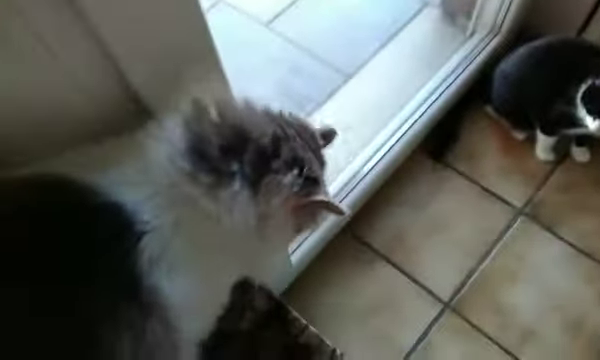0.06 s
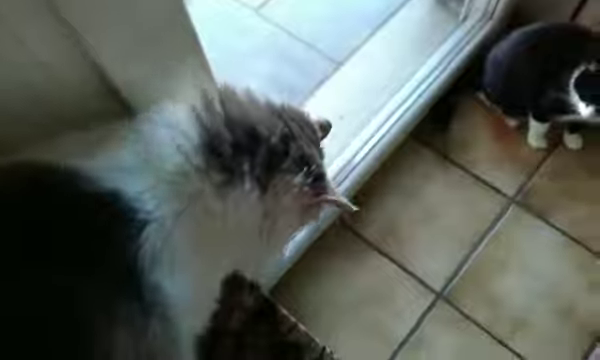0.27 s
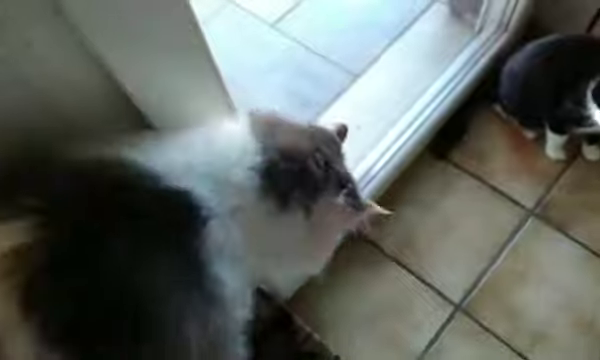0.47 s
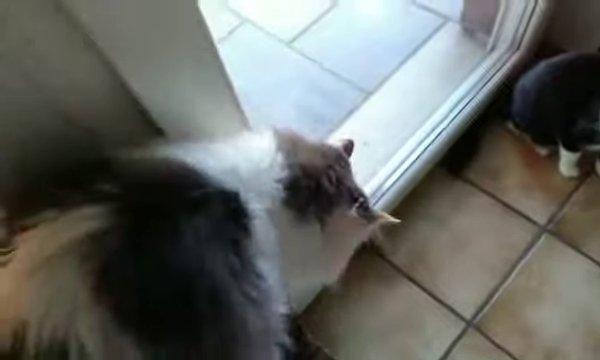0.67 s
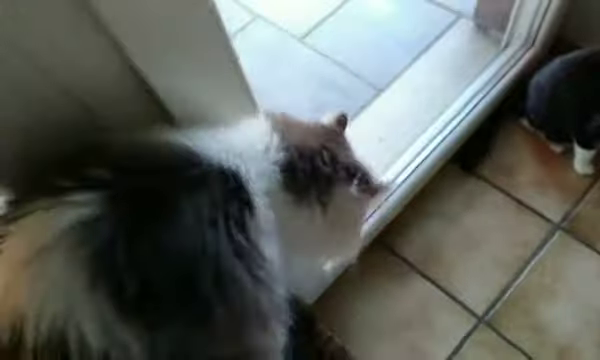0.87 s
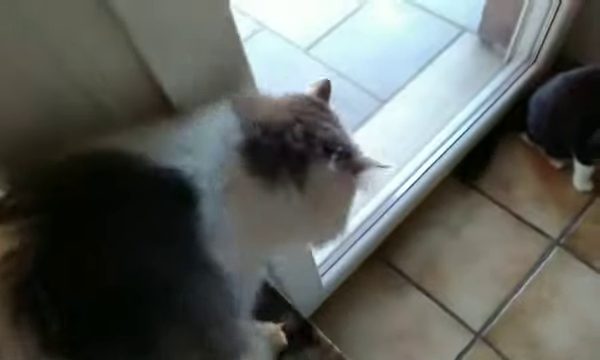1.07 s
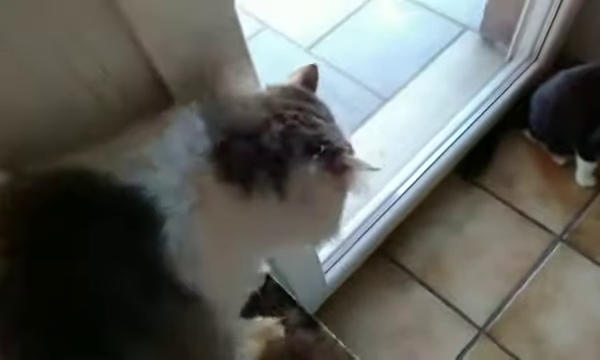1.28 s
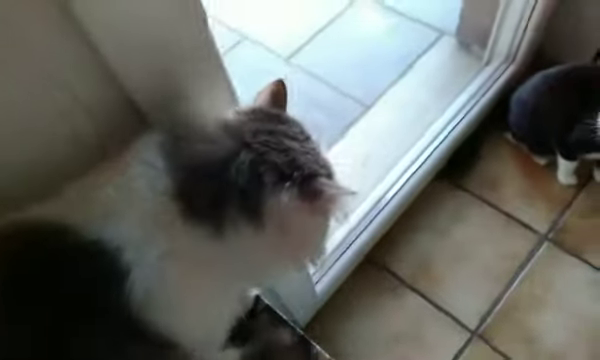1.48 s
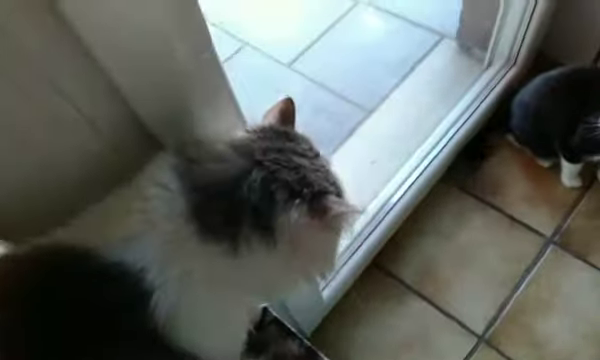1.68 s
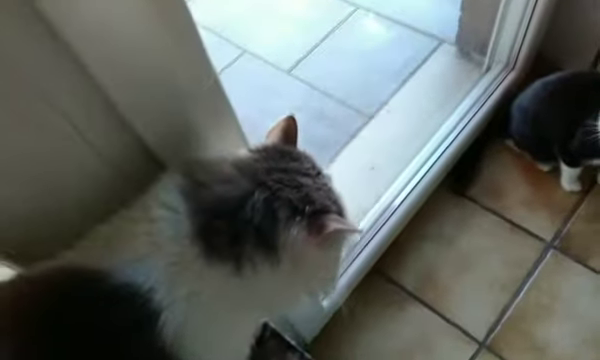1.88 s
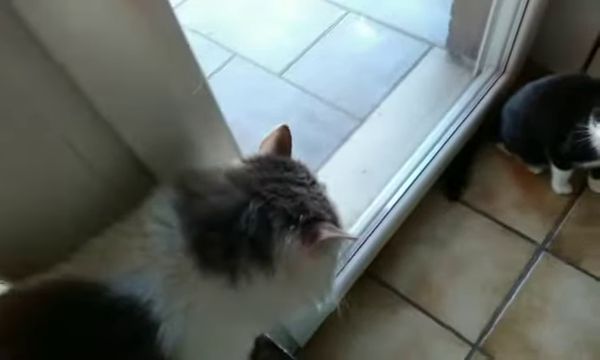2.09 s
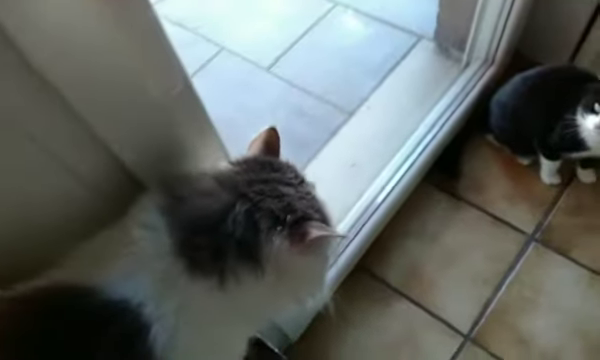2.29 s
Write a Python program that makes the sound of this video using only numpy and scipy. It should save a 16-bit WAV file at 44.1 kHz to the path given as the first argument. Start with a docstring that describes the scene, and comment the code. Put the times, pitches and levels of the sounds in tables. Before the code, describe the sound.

A cat growls, rises into a raspy, hissing yowl, then sinks back to a growl.

```python
"""A cat warns another in one long call, beside an open door in a quiet tiled room.
Its vocal folds buzz and flutter behind a closed mouth, making a growl. The mouth opens and the
pitch climbs into a yowl, with rasping breath, a hiss through bared teeth and a hoarse crack.
Then the mouth closes and the growl sinks and fades. Two faint taps sound near the end.
Tiles and door add a short echo, and a low rumble lies under it all."""
import sys
import numpy as np
from scipy import signal
from scipy.fft import rfft, irfft
from scipy.io import wavfile

SR = 44100
rng = np.random.default_rng(int(sys.argv[2]) if len(sys.argv) > 2 else 0)


def file_out(sig):
    """Save sig as 16-bit WAV at sys.argv[1]."""
    # one column per channel
    cols = np.atleast_2d(sig).T
    # limit, then scale
    lim = np.clip(cols, -1, 1)
    pcm = np.round(lim * 32767).astype(np.int16)
    wavfile.write(sys.argv[1], SR, pcm)


N = 108045
TIME = np.arange(N) / SR
OVERTONE_JITTER, OVERTONE_SHIMMER = .008, .22   # random wobble in timing [cycles] and in strength

# The tune of the call: (time [s], pitch [Hz])
CALL_PITCH = [(.14, 168.7), (.24, 191.8), (.29, 235.7), (.33, 319.8), (.38, 339.6), (.44, 342.6),
              (.55, 362.5), (.65, 378.1), (.79, 380.4), (.83, 412.3), (.92, 450.7), (.945, 479.2),
              (.99, 485.7), (1.07, 418.4), (1.15, 300.4), (1.26, 296.8), (1.34, 256.2), (1.6, 243.2),
              (1.67, 212.7), (1.9, 200.1), (2.14, 172.8), (2.21, 160.3), (2.3, 118.8)]
# The fast trembling of the voice: (time [s], depth [0-1], rate [Hz])
VOICE_FLUTTER = [(.2, .7, 60), (.33, .58, 62), (.42, .12, 64), (.9, .17, 64), (1.1, .17, 66),
                 (1.2, .55, 66), (1.35, .27, 66), (1.58, .32, 67), (1.7, .58, 64), (2.15, .72, 56)]


def from_db(db):
    """Turn decibels into a number to multiply by."""
    return 10 ** (np.asarray(db) / 20)


def unit_power(x):
    """Scale a signal to an average power of one."""
    return x / np.sqrt(np.mean(x ** 2) + 1e-20)


def in_time(rows):
    """Join a table's points with straight lines: one curve for each column after the time."""
    times, *columns = np.transpose(rows)
    return [np.interp(TIME, times, column) for column in columns]


def gain_at(colour, hz):
    """Read a table of frequencies and levels as a gain at the given frequencies."""
    points_hz, db = np.transpose(colour)
    return from_db(np.interp(np.log(hz + 1e-9), np.log(points_hz), db))


def shaped(x, colour):
    """Make each frequency louder or softer, as the table says."""
    return irfft(rfft(x) * gain_at(colour, np.fft.rfftfreq(N, 1 / SR)), N)


def noise(colour):
    """Noise with the given balance of low and high frequencies."""
    return unit_power(shaped(rng.standard_normal(N), colour))


def drift(rate_hz):
    """A smooth random wobble, mostly slower than the given rate."""
    hz = np.fft.rfftfreq(N, 1 / SR)
    return unit_power(irfft(rfft(rng.standard_normal(N)) / (1 + (hz / rate_hz) ** 4), N))


def narrow_noise(hz, width_hz):
    """Noise gathered around one frequency, which may move."""
    angle = 2 * np.pi * np.cumsum(hz * np.ones(N)) / SR
    return drift(width_hz) * np.cos(angle) + drift(width_hz) * np.sin(angle)


def swell(start_s, end_s, rise_s, fall_s):
    """Fade in, hold and fade out."""
    return np.clip((TIME - start_s) / rise_s, 0, 1) * np.clip((end_s - TIME) / fall_s, 0, 1)


def background():
    """The quiet room's steady low rumble."""
    # Tone of the rumble: (frequency [Hz], level [dB])
    colour = [(25, -13), (38, -6), (52, 6), (70, -3.5), (105, 5), (180, -9.5), (380, -9), (600, -27.5),
              (1000, -40.5), (2500, -42.5), (12000, -41.5), (13500, -48.5)]
    return from_db(-64.5) * noise(colour)


def vocal_folds():
    """The folds swing and flutter unevenly, which bends the pitch and chops the overtones into bursts."""
    hz, = in_time(CALL_PITCH)
    depth, rate = in_time(VOICE_FLUTTER)
    uneven = .28   # how much noise mixes into the flutter
    beat = 2 * np.pi * np.cumsum(rate * (1 + .24 * depth * drift(35.6))) / SR
    flutter = depth * (np.cos(beat) + uneven * narrow_noise(rate * 1.1, 37))
    bend = .22 * depth * (np.cos(beat - .8) + uneven * narrow_noise(rate, 40))
    waver = (.006 + .02 * depth) * drift(35.3)
    phase = 2 * np.pi * np.cumsum(hz * (1 + bend + waver)) / SR
    # Nearly half a beat late: the overtones burst out as the lowest tone ebbs.
    late_flutter = depth * (np.cos(beat - 2.66) + uneven * narrow_noise(rate, 55))
    bursts = (1 + np.tanh(late_flutter)) / np.sqrt(1 + depth / 2)
    return phase, flutter, bursts


def lowest_tone(phase, flutter):
    """The strong base of the voice: one wave for each swing of the vocal folds."""
    # Strength of the tone: (time [s], level [dB])
    loudness = [(.11, -77.5), (.15, -54), (.24, -44), (.4, -38), (.485, -31), (.53, -37.5), (.64, -40.5),
                (.76, -43.5), (.83, -48.5), (.885, -48), (.915, -50), (.94, -63), (.99, -52), (1.09, -48),
                (1.115, -38), (1.27, -45.5), (1.33, -40.5), (1.7, -41.5), (1.85, -45), (2.16, -48),
                (2.28, -52.5), (2.33, -99)]
    db, = in_time(loudness)
    return np.sqrt(2) * from_db(db) * (1 + .95 * flutter + .14 * drift(87)) * np.cos(phase)


def overtones(phase, bursts, step_db):
    """The folds' buzz: tones at 2 to 11 times the pitch, changing by step_db from one to the next."""
    strained = phase + 2 * np.pi * OVERTONE_JITTER * drift(94)
    buzz = 0
    for k in range(2, 12):
        strength = from_db(step_db * (k - 1.5)) * (1 + OVERTONE_SHIMMER * drift(72))
        buzz += strength * np.cos(k * strained + k * k)   # k * k keeps the peaks from lining up
    return np.sqrt(2) * bursts * buzz


def growl(phase, bursts):
    """Buzz and swirling air in the throat, dulled by the closed mouth."""
    # How the throat filters the buzz with the mouth shut: (frequency [Hz], gain [dB])
    closed_throat = [(230, -3.5), (350, 1), (440, -3.5), (550, 1.5), (680, -15.5), (1100, -44)]
    # Tone of the air in the throat: (frequency [Hz], level [dB])
    air_colour = [(50, -9.5), (120, 8), (250, 0), (520, 6), (660, -16.5), (850, -41), (2000, -54.5)]
    depth, _ = in_time(VOICE_FLUTTER)
    buzz = from_db(-47.5) * shaped(overtones(phase, bursts, step_db=-10.5), closed_throat)
    air = from_db(-60) * np.sqrt(2 * depth) * noise(air_colour)
    return swell(.14, 2.313, rise_s=.14, fall_s=.12) * (buzz + air)


def nose(phase, bursts):
    """The buzz rings faintly in the nose."""
    # How the nose filters the buzz: (frequency [Hz], gain [dB])
    colour = [(920, -28), (1050, 4.5), (1170, 0.5), (1270, -15.5), (1350, -18.5), (1480, -9), (1750, -37)]
    ring = shaped(overtones(phase, bursts, step_db=0), colour)
    return from_db(-72.5) * swell(.23, 2.084, rise_s=.037, fall_s=.83) * ring


def yowl(phase, bursts):
    """The buzz comes out bright through the open mouth, whose ring moves with the jaw."""
    # The mouth opening and closing: (time [s], overtone level [dB], ring frequency [Hz])
    opening = [(.22, -72, 1270), (.39, -67, 1100), (.425, -44.5, 1126), (.51, -48.5, 1280),
               (.58, -49.5, 1160), (.7, -54.5, 1100), (.77, -50, 1100), (.88, -51, 1166),
               (1.02, -52.5, 1132), (1.18, -64.5, 1122), (1.4, -77, 1133), (1.8, -84.5, 1130)]
    # How the throat filters the buzz with the mouth wide open: (frequency [Hz], gain [dB])
    open_throat = [(400, -4), (950, 0), (1400, -6), (1950, -19), (2300, -30.5)]
    ring_db, ring_width_hz = 8.5, 214
    db, ring_hz = in_time(opening)
    hz, = in_time(CALL_PITCH)
    strained = phase + 2 * np.pi * OVERTONE_JITTER * drift(48)
    buzz = 0
    for k in range(2, 9):
        ring = from_db(ring_db * np.exp(-((k * hz - ring_hz) / ring_width_hz) ** 2))
        shimmer = 1 + OVERTONE_SHIMMER * drift(140)
        buzz += ring * gain_at(open_throat, k * hz) * shimmer * np.cos(k * strained + k * k)
    return from_db(db) * bursts * buzz


def rasp(phase, flutter):
    """Breath, chopped by the vocal folds, rings in the mouth and dulls as the lips close."""
    # Strength of the breath: (time [s], level [dB])
    loudness = [(.33, -100), (.4, -78), (.428, -52.5), (.52, -50.5), (.75, -53.5), (.9, -59.5), (1.05, -68),
                (1.17, -61), (1.28, -67), (1.4, -77.5), (1.6, -82.5), (1.8, -84)]
    # Tone of the breath in the mouth: (frequency [Hz], level [dB])
    colour = [(300, -30), (600, -9), (1000, -2.5), (1350, 0.5), (1650, -1), (1900, 0), (2300, -5),
              (2650, 2), (3150, 0), (3600, -17), (4300, -7), (4700, -5.5), (5150, 0.5), (6050, -8.5),
              (6900, 0), (8100, -16), (9000, -7.5), (10100, -16), (11100, -6), (13000, -20), (15600, -22)]
    # The lips muffle everything above a cutoff: (time [s], cutoff [Hz])
    lips = [(.41, 3730), (.455, 15980), (.9, 15100), (1.08, 5360), (1.24, 5900), (1.36, 1673), (1.7, 1419)]
    db, = in_time(loudness)
    cutoff_hz, = in_time(lips)
    air = noise(colour) * (1 + .057 * np.cos(phase)) * (1 + .79 * flutter)
    hz, times, slices = signal.stft(air, SR, nperseg=256)   # short slices let the cutoff move
    muffle = 1 / np.sqrt(1 + (hz[:, None] / np.interp(times, TIME, cutoff_hz)) ** 8)
    return from_db(db) * signal.istft(slices * muffle, SR)[1][:N]


def whistle(bursts):
    """The breath's thin ring in the mouth, which lingers as the lips close."""
    # Path of the ring: (time [s], level [dB], frequency [Hz])
    ring = [(.39, -107, 2900), (.51, -57, 2945), (.65, -57, 2730), (.76, -56, 2757), (.92, -64, 2572),
            (1.15, -65, 2777), (1.36, -76, 2840), (1.6, -84, 2693), (1.7, -105, 2687)]
    db, hz = in_time(ring)
    return from_db(db) * bursts * narrow_noise(hz, width_hz=130)


def hiss():
    """A smooth, bright jet of air through the teeth at the top of the yowl."""
    # Tone of the jet: (frequency [Hz], level [dB])
    colour = [(1500, -31), (4000, -2), (7000, -1.5), (9800, 6.5), (12000, -0.5), (15500, -1)]
    return from_db(-58.5) * swell(.684, 1.109, rise_s=.2, fall_s=.12) ** 2 * noise(colour)


def crack():
    """The voice breaks hoarsely just before its highest note."""
    # Tone of the break: (frequency [Hz], level [dB])
    colour = [(120, -18), (550, 12.5), (900, -2), (2500, -29)]
    return from_db(-48) * swell(.893, .9214, rise_s=.01, fall_s=.01) * noise(colour)


def taps():
    """Two light, brushing touches, each a puff of noise with one broad ring."""
    # The touches: (start [s], level [dB], rise [s], time to fade by 60 dB [s], ring frequency [Hz])
    touches = [(1.695, -75.5, 0.019, 0.35, 8820), (2.035, -65.5, 0.011, 0.19, 6168)]
    # Tone of a touch before its ring is added: (frequency [Hz], level [dB])
    colour = [(800, -6.5), (1200, -1), (1700, -32), (3800, -20.5), (5000, -1), (7000, 1), (11000, -5),
              (14000, -2.5), (15500, -14)]
    ring_db, ring_width_octaves = 11.5, .14
    hz = np.fft.rfftfreq(N, 1 / SR) + 1
    out = 0
    for start, db, rise, fade, ring_hz in touches:
        ring = from_db(ring_db * np.exp(-(np.log2(hz / ring_hz) / ring_width_octaves) ** 2))
        brush = unit_power(irfft(rfft(noise(colour)) * ring, N))
        fade_in = np.clip((TIME - start) / rise, 0, 1)
        fade_out = from_db(-60 * np.maximum(TIME - start - rise, 0) / fade)
        out += from_db(db) * fade_in * fade_out * brush
    return out


def room_echo(x):
    """Sound bounces off tiles and door and blurs into a short echo with little bass."""
    # Tone of the echo: (frequency [Hz], level [dB])
    colour = [(900, 4), (3000, -5.5), (12000, -6.5)]
    fade_s, delay_s, low_cut_hz = .26, .0016, 540
    tail = noise(colour) * from_db(-60 * TIME / fade_s) * (TIME > delay_s)
    tail = signal.sosfilt(signal.butter(4, low_cut_hz, "high", fs=SR, output="sos"), tail)
    return from_db(-6.5) * signal.fftconvolve(x, tail / np.linalg.norm(tail))[:N]


def scene():
    """The cat and the taps with their echo, over the low rumble."""
    phase, flutter, bursts = vocal_folds()
    mouth = yowl(phase, bursts) + rasp(phase, flutter) + whistle(bursts) + hiss() + crack()
    mouth *= swell(.24, 1.8, rise_s=.11, fall_s=.11)   # the mouth opens, then shuts
    cat = lowest_tone(phase, flutter) + growl(phase, bursts) + nose(phase, bursts) + mouth
    direct = cat + taps()
    return (direct + room_echo(direct) + background())[None]


def record(dry):
    """Cut away the very highest treble."""
    cutoff_hz = 15700
    return signal.sosfilt(signal.ellip(12, .1, 80, cutoff_hz, fs=SR, output="sos"), dry)


dry = scene()
out = record(dry)
file_out(out)
```